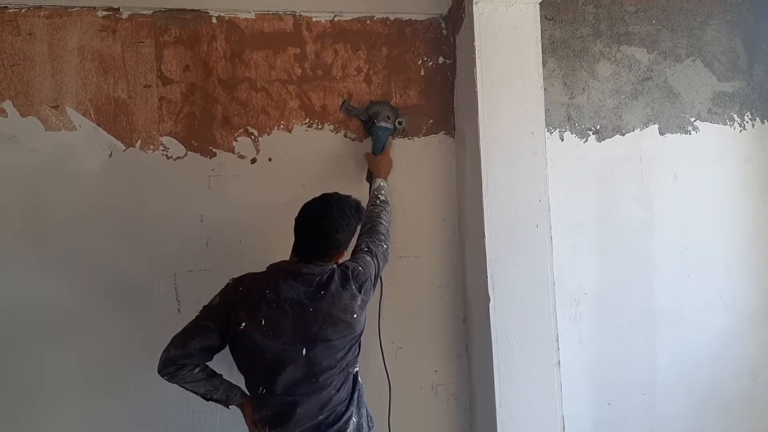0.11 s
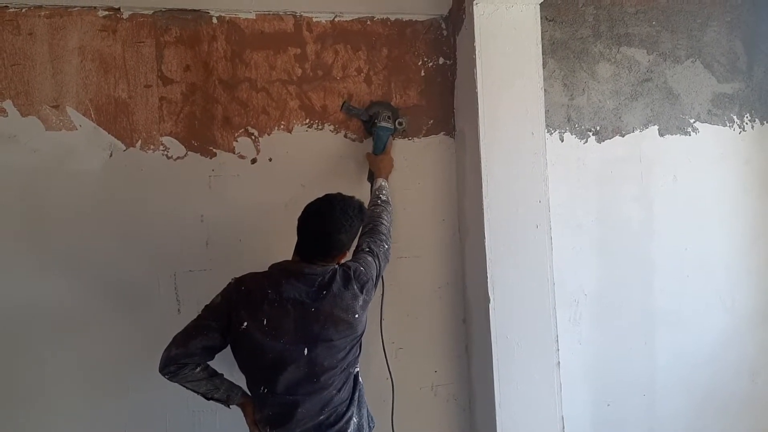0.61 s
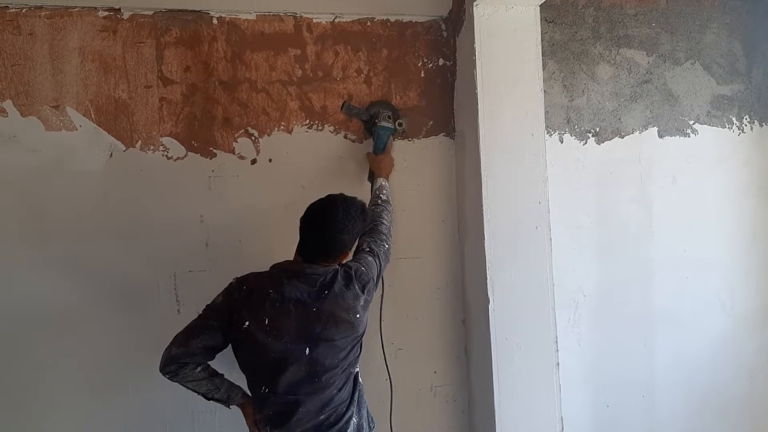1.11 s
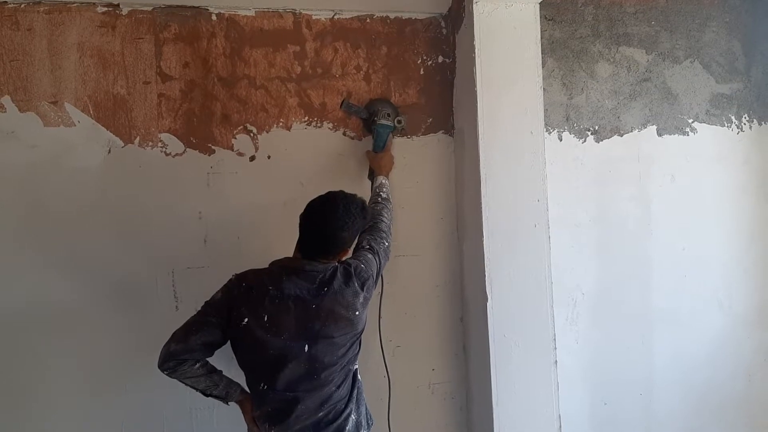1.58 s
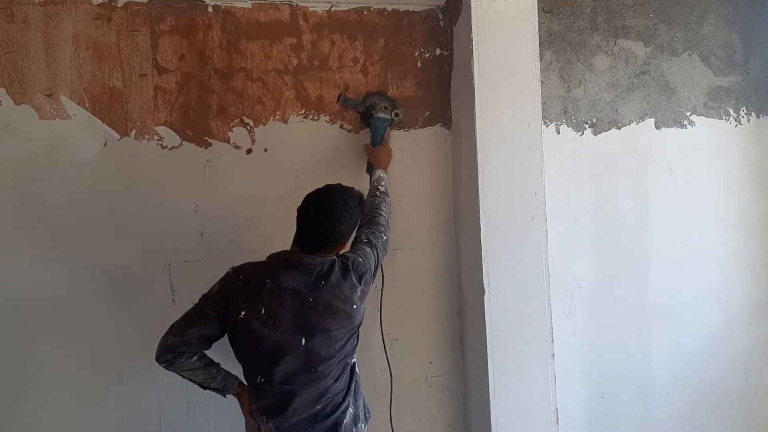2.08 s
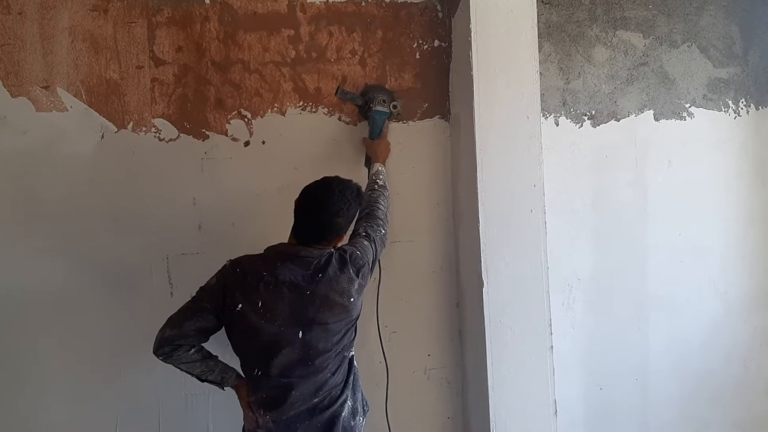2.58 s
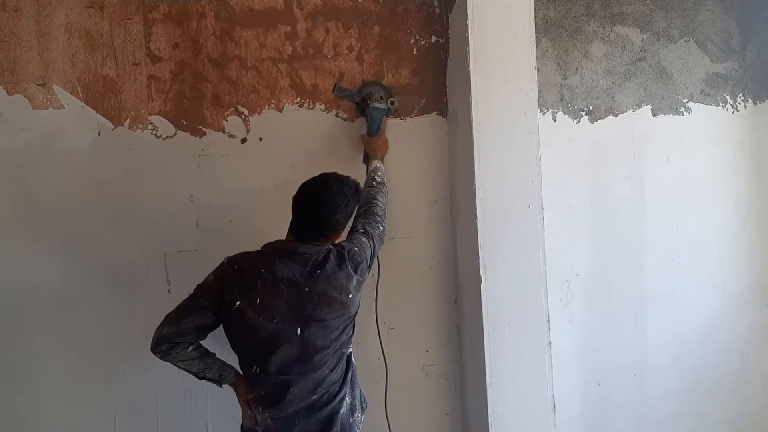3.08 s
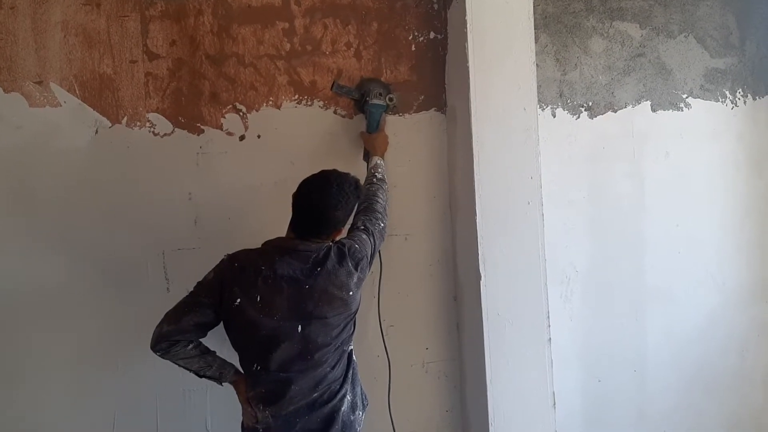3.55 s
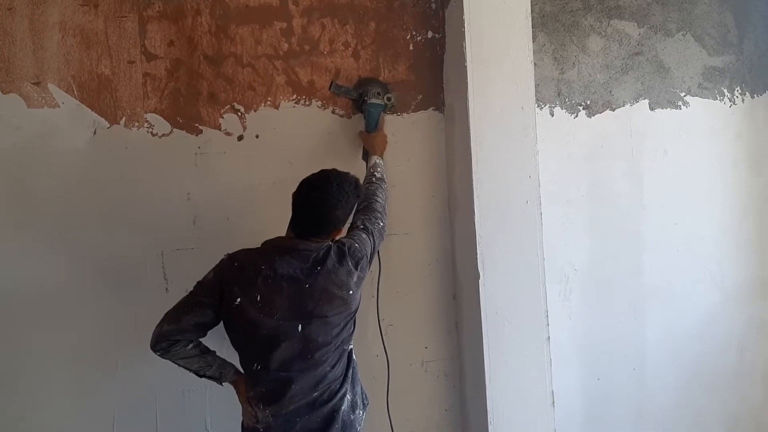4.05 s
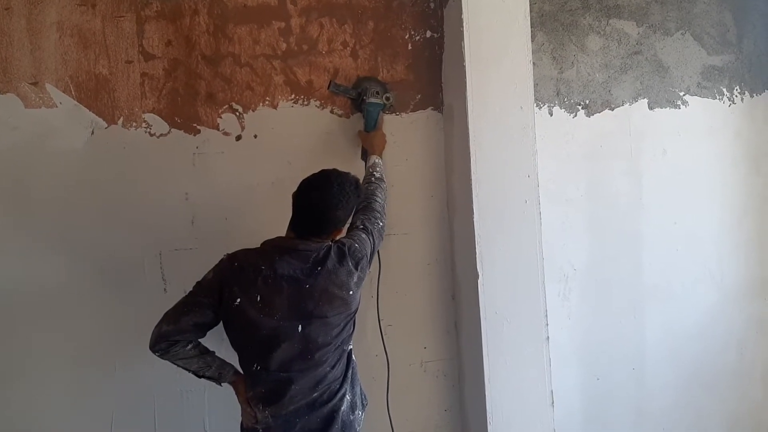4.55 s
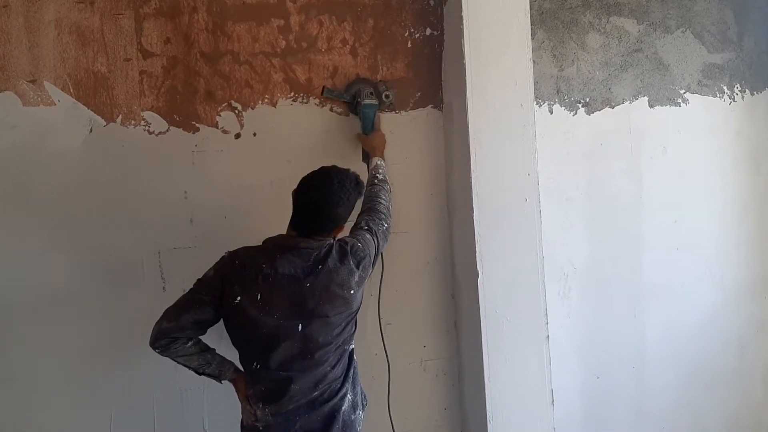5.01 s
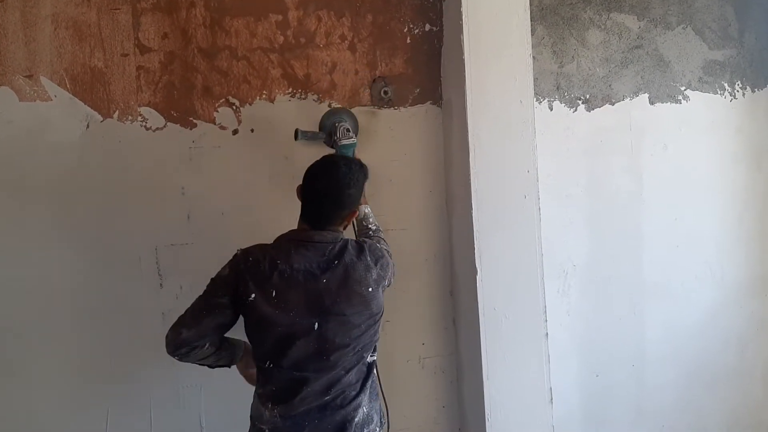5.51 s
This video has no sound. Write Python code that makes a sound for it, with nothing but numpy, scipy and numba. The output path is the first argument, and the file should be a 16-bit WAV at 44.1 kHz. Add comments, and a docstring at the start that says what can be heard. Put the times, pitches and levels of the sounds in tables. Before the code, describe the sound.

An electric angle grinder is already at full work, stripping coating from a wall in a bare, hard-surfaced room. From 0 to about 5 seconds there is a dense, continuous harsh noise: a metallic scraping ring in the middle range, bright sandy hiss on top, a high gear whine with rattling housing, and rushing fan air. A low lumpy rumble from the wall drops back around 1.6 seconds. The motor sags slightly in pitch near 1.7 to 2.3 seconds, then recovers; faint tones come and go, with a clearer ring around 3.4 to 4.4 seconds. At about 5 seconds the disc leaves the wall, the scrape cuts out, and the freed motor climbs in pitch, quieter and smoother. Near 5.3 seconds a small puff of hiss comes as the tool turns away, and it is still spinning at the end. Stereo pickup, short dense echo, slightly louder right.

```python
"""An angle grinder strips coating off a wall in a bare plastered room, heard by two microphones.
Grit scrapes and rings the disc and guard: noise grains with a faint repeat on every turn.
The bevel gear whines and the fan blows, as filtered noise; spindle tones come and go as sines.
At five seconds the disc leaves the wall: the scraping stops and the unloaded motor runs up."""
import sys
import numpy as np
from scipy import signal
from scipy.fft import rfft, irfft, next_fast_len
from scipy.io import wavfile
from scipy.ndimage import uniform_filter1d
from numba import njit

SR = 44100
rng = np.random.default_rng(int(sys.argv[2]) if len(sys.argv) > 2 else 0)


def transcribe(u):
    """Save the signal u as a 16-bit wav file named by the first command-line argument.

    u: samples, shape (n,) or (channels, n), limited to [-1, 1]; the rate is SR.
    q: integer samples, one column per channel.
    """
    v = np.clip(np.atleast_2d(u).T, -1, 1)
    q = np.round(v * 32767).astype(np.int16)
    wavfile.write(sys.argv[1], SR, q)


def gain_from_db(level_db):
    """Convert decibel levels to linear amplitude factors (20 dB per decade)."""
    decades = np.asarray(level_db, float) / 20
    return 10 ** decades


N = 248710
T = np.arange(N) / SR  # seconds

# Disc and guard resonances. Each row: centre in Hz, width in Hz, relative level in dB.
DISC_MODES = [(1190, 24, -18.5), (1592, 59, -14), (1550, 51, -10.5), (1662.6, 48, -2.5), (1744, 65, -2),
              (1821, 27, -4), (1870, 60, -13), (1932, 44, -9), (2077, 27, -24.5), (2183, 200, -11),
              (2595, 130, -15)]
# Treble rings of the disc rim. Each row: centre in Hz, width in Hz, relative level in dB.
RIM_MODES = [(8240, 30, 2.5), (14600, 450, 1)]
# Tone colour of the bare scrape. Each row: frequency in Hz, relative level in dB.
SCRAPE_COLOUR = [(40, -70), (80, -80), (600, -38), (1000, -32), (1400, -18.5), (1750, -16.5), (2500, -27),
                 (3500, -28), (7000, -27)]
# Tone colour of the grit hiss. Each row: frequency in Hz, relative level in dB.
GRIT_COLOUR = [(5000, -20), (7000, -2), (8800, -9), (10000, -5), (11000, -1), (12400, 0), (13500, -2.5),
               (14500, -1), (15000, 0), (16000, -1.5)]
# Disc ring while it cuts. Each row: time in seconds, relative level in dB.
CUTTING_RING = [(0, -22), (.4, -22), (.55, -20), (1.45, -19), (1.6, -20.5), (3.35, -22), (3.55, -18.5),
                (3.9, -19.5), (4.3, -21.5), (4.7, -19), (4.97, -19)]
# Gear housing resonances. Each row: centre in Hz, width in Hz, relative level in dB.
HOUSING_MODES = [(3230, 400, -31), (3900, 420, 8), (3950, 35, 0), (4210, 42, 15.5), (4775, 50, 11),
                 (4846, 140, 12), (5180, 190, 9.5), (5920, 950, 6), (6830, 830, -2.5)]
# Tone colour of the fan air. Each row: frequency in Hz, relative level in dB.
FAN_COLOUR = [(80, -60), (700, -55.5), (1200, -17.5), (2000, -16), (3000, -13), (4500, -7), (6000, -16),
              (7500, -36), (9000, -35), (16000, -23)]
# Motor and gearbox under load. Each row: time in seconds, relative level in dB.
MOTOR_LOADED = [(0, -18), (.1, -17.5), (3.1, -17), (3.5, -18.5), (4.97, -18)]
# Swells and dips of the free motor. Each row: centre in seconds, width in seconds, change in dB.
MOTOR_SWELLS = [(5.265, 0.019, -5), (5.36, 0.096, 3), (5.62, 0.07, 2.5)]
# Spindle speed under load. Each row: time in seconds, speed in turns a second.
LOADED_SPEED = [(0, 131.6), (.9, 132.1), (1.5, 130.6), (1.67, 128.6), (1.86, 126.8), (2.25, 127.4),
                (3.36, 130.9), (3.62, 132.6), (4.2, 132.3), (4.5, 130.9), (4.85, 130.6), (5.02, 132)]
# Spindle tones that come and go. Each row: multiple of the turn rate, start in seconds,
# end in seconds, level in dB.
SPINDLE_TONES = [(1, 0, 5.02, -60.5), (3, 1.4, 3.1, -56), (7, 1.7, 2.8, -54), (6, 2, 2.3, -58),
                 (4, 0, 1.5, -59), (7, .5, .53, -43), (7, .62, .69, -41), (7, .84, .89, -41),
                 (7, 1, 1.04, -41), (7, 1.15, 1.2, -43), (8, 2.8, 5, -51), (9, 2.8, 5, -44),
                 (10, 3.36, 4.42, -37), (13, 3.4, 4.4, -32), (13, 3.52, 3.61, -23), (13, 3.84, 3.97, -25),
                 (13, 4.04, 4.11, -23), (13, 4.2, 4.3, -26), (13, 4.5, 4.8, -31), (11, 3.5, 4.45, -41),
                 (4, 4.4, 5, -59), (32, .5, 1.1, -31), (33, .8, .95, -30), (32, 1.3, 1.55, -28),
                 (31, 1.75, 1.95, -29), (33, 2.1, 2.5, -32), (31, 2.3, 2.55, -28), (32, 2.66, 2.95, -24),
                 (32, 3, 3.4, -31), (32, 3.5, 3.92, -29), (32, 4.15, 4.4, -27), (32, 4.45, 4.8, -31),
                 (36, .1, .7, -30), (36, 2.7, 3.2, -32), (36, 4.25, 4.95, -31), (40, 1.3, 3.2, -35),
                 (45, 2.75, 3.15, -35), (16, 2.65, 2.9, -34), (1, 5.4, 5.7, -68), (3, 5.45, 5.7, -62),
                 (6, 5.46, 5.58, -44)]
# Hum at the fifth spindle multiple. Each row: time in seconds, level in dB.
SPINDLE_HUM = [(0, -55), (.4, -52), (1.2, -58), (1.28, -48), (1.52, -47), (1.6, -54.5), (2.65, -55),
               (2.8, -50.5), (3.1, -49), (4.4, -49.5), (4.5, -44.5), (4.7, -48), (4.82, -42.5), (4.92, -42),
               (5, -51), (5.07, -50), (5.1, -64)]
# Winding buzz at four times the mains. Each row: time in seconds, level in dB.
WINDING_BUZZ = [(0, -57), (.8, -65), (3, -70), (3.4, -75), (5.7, -81)]
# Tone colour of the wall rumble. Each row: frequency in Hz, relative level in dB.
WALL_COLOUR = [(30, -46), (110, -50), (200, -8), (400, -9.5), (700, -3.5), (950, 6), (1400, -7),
               (2000, -37)]
# Left-right difference of echo and rumble. Each row: frequency in Hz, level of the difference in dB.
SPREAD = [(60, -22), (200, -21), (400, -5), (700, -1), (1500, -3), (3000, -1.5), (6000, 4), (16000, -1.5)]

JUDDER, FLUTTER, WAVER, SWAY = 90, 60, 24, 7  # random level steps a second
MAINS_HZ, GEAR_TEETH, HUM_MULTIPLE = 50, 32, 5
LIFT_S, LIFT_TAKES_S = 4.98, 0.043  # the disc leaves the wall
RUN_UP_S, RUN_UP_TAU_S, FREE_TURNS = 5.07, 0.33, 178  # then climbs towards this many turns a second
GRIT_DB, RUMBLE_DB = -22, -38.5  # while cutting
RUMBLE_DROP_S, RUMBLE_DROP_TAKES_S, RUMBLE_DROP_DB = 1.545, 0.057, -13
SPINNING_RING_DB, SPINNING_GRIT_DB, SPINNING_RUMBLE_DB = -34.5, -39, -49  # off the wall
FADE_DB, FADE_TAU_S = 3, 0.13  # hiss and rumble die away for a moment after the lift
# as the free disc is turned away its hiss steps up, with a short puff
PUFF_S, PUFF_RISE_S, PUFF_DECAY_S, PUFF_DB, PUFF_STAYS_DB = 5.305, 0.02, 0.04, 2, 4
MOTOR_FREE_DB, MOTOR_EASES_S = -21, 0.13
WHINE_WIDTH_HZ, VENT_WIDTH_HZ, VENT_DB = 680.0, 520.0, -9.5  # widths for each filter pass
ROOM_T60_S, ROOM_DB = 0.42, -2.1
RIGHT_DB = 1.5  # right channel over left
LOW_HZ, TOP_HZ = 75, 15750  # range of the finished sound


def disc(speed, pressure, grip):
    """Scraping grains ring the metal disc, and grit hisses off it."""
    ring_db, grit_db, _ = contact()
    rub = every_turn(grains(5.2, 1.7, JUDDER), SR / speed, 0.2)
    ringing = gain_from_db(-0.5) * ring(rub, DISC_MODES, flicker_db=1.6, rate=FLUTTER, sway_db=0.91)
    scrape = gain_from_db(-9.0) * unit(colour(rub, SCRAPE_COLOUR))
    metal = gain_from_db(ring_db) * (ringing + scrape)
    hiss = unit(colour(grains(2.5, 1.64, JUDDER), GRIT_COLOUR, RIM_MODES))
    grit = gain_from_db(grit_db + 0.53 * walk(WAVER) + 0.71 * walk(FLUTTER)) * hiss
    return pressure * metal + grip * grit


def contact():
    """Levels in dB of ring, grit and rumble: cutting, then spinning in the air."""
    off = ramp(LIFT_S, LIFT_TAKES_S)
    since_puff = np.maximum(T - PUFF_S - PUFF_RISE_S, 0)
    puff_db = PUFF_STAYS_DB + PUFF_DB * np.exp(-since_puff / PUFF_DECAY_S)
    puff_db = ramp(PUFF_S, PUFF_RISE_S) * puff_db
    fade_db = FADE_DB * np.exp(-np.maximum(T - LIFT_S, 0) / FADE_TAU_S)
    rumble_db = RUMBLE_DB + RUMBLE_DROP_DB * ramp(RUMBLE_DROP_S, RUMBLE_DROP_TAKES_S)
    cutting = curve(CUTTING_RING), GRIT_DB, rumble_db
    spinning = SPINNING_RING_DB, SPINNING_GRIT_DB + fade_db + puff_db, SPINNING_RUMBLE_DB + fade_db
    return [(1 - off) * a + off * b for a, b in zip(cutting, spinning)]


def motor(speed, grip):
    """Fan air, gear rattle and mesh whine, pulsing at twice the mains; the whine follows the speed."""
    mains = 1 + 0.16 * np.cos(2 * np.pi * 2 * MAINS_HZ * T)
    # under load the housing rings; running free, the mesh whine and the air vents take over
    free = np.interp(T, [5, 5.32], [0, 1])

    rattle = every_turn(grains(2.6, 2.2, JUDDER), SR / speed, 0.2)
    housing = ring(rattle, HOUSING_MODES, flicker_db=1.8, rate=FLUTTER, sway_db=1.3)
    housing = gain_from_db(-3.0 - 16 * free) * housing

    # the whine's band sits slightly above the tooth rate when running free
    whine_hz = (GEAR_TEETH + 0.3 * free) * speed
    knock_db = 4 * free * np.cos(2 * np.pi * np.cumsum(speed) / SR)  # free gears knock once a turn
    mesh_db = -11.5 + 7 * free + knock_db + 0.8 * walk(FLUTTER)
    mesh = gain_from_db(mesh_db) * moving_note(grains(2, 1, JUDDER), whine_hz, WHINE_WIDTH_HZ)

    air = gain_from_db(1.0 - 3 * free) * unit(colour(grains(2.56, 0.69, JUDDER), FAN_COLOUR))
    # the vent note sinks as the tool turns away
    vent_hz = np.interp(T, [5.18, 5.3, 5.4, 5.5], [3550.0, 3250.0, 2850.0, 2950.0])
    vents = moving_note(rng.standard_normal(N), vent_hz, VENT_WIDTH_HZ)
    vents = free * gain_from_db(VENT_DB + 0.8 * walk(WAVER)) * vents
    return gain_from_db(motor_db()) * mains * (grip * (housing + mesh) + air + vents)


def motor_db():
    """Level of motor and gearbox: eases off with the load, then swells and dips as the tool is moved."""
    eased = ramp(LIFT_S, MOTOR_EASES_S)
    swell_db = sum(db * np.exp(-((T - s) / width) ** 2) for s, width, db in MOTOR_SWELLS)
    return (1 - eased) * curve(MOTOR_LOADED) + eased * MOTOR_FREE_DB + swell_db


def spindle():
    """Turns a second: the load sets them, then they climb towards the free speed."""
    loaded = curve(LOADED_SPEED)
    run_up = 1 - np.exp(-np.maximum(T - RUN_UP_S, 0) / RUN_UP_TAU_S)
    return loaded + (FREE_TURNS - loaded) * run_up


def tones(speed):
    """Sines at multiples of the spindle turn, wavering in strength and phase, over a winding buzz."""
    turn = 2 * np.pi * np.cumsum(speed) / SR

    def tone(multiple, db):
        """One spindle multiple; its phase wanders more the higher it is."""
        phase = multiple * turn + 0.05 * multiple * walk(WAVER)
        return gain_from_db(db + 1.7 * walk(WAVER)) * np.sqrt(2) * np.sin(phase)

    buzz = np.sqrt(2) * np.sin(2 * np.pi * 4 * MAINS_HZ * T)
    buzz = gain_from_db(curve(WINDING_BUZZ) + 2.5 * walk(SWAY)) * buzz
    out = tone(HUM_MULTIPLE, curve(SPINDLE_HUM)) + buzz
    for multiple, start, end, db in SPINDLE_TONES:
        # 55 ms fades reach a little outside the given times
        fade = np.clip(np.minimum(T - start + 0.041, end - T + 0.051) / 0.055, 0, 1)
        out = out + fade * tone(multiple, db)
    return out


def wall():
    """The wall rumbles in lumps of filtered grains; its bass is alike left and right."""
    mid, side = (unit(colour(grains(2.0, 0.43, FLUTTER), WALL_COLOUR)) for _ in range(2))
    side = gain_from_db(-2.5) * colour(side, SPREAD)
    rumble_db = contact()[2] - 1.0 + 0.67 * walk(WAVER) + 1.6 * walk(SWAY)
    return gain_from_db(rumble_db) * np.array([mid + side, mid - side])


def room(x):
    """Direct sound, a shade earlier on the left, and a dense echo that changes as the tool moves."""
    hop = int(SR * 0.2)  # a new noise tail every 0.2 s, cross-faded
    t = T[:3 * hop]
    lead = np.concatenate([x[3 * hop:0:-1], x, np.zeros(2 * hop)])  # the tool was already running
    wet = np.zeros((2, len(lead) + 5 * hop))
    fade = np.sin(np.pi * np.arange(2 * hop) / (2 * hop))
    decay = gain_from_db(-60 * t / ROOM_T60_S) * np.clip((t - 0.002) / 0.0024, 0, 1)
    for i in range(0, len(lead) - 2 * hop, hop):
        tail = rng.standard_normal((2, len(t))) * decay
        mid, side = tail[0], colour(tail[1], SPREAD)  # same bass, different treble at each microphone
        pair = np.array([mid + side, mid - side]) / np.sqrt(np.sum(mid ** 2))
        piece = lead[i:i + 2 * hop] * fade
        wet[:, i:i + 5 * hop - 1] += signal.fftconvolve(piece[None], pair, axes=1)
    direct = np.array([x, np.roll(x, 1)])
    echo = gain_from_db(ROOM_DB) * wet[:, 3 * hop:3 * hop + N]
    return (direct + echo) * gain_from_db(-3.5)


def grains(scatter_db, flicker_db, rate):
    """Dense clicks of uneven but bounded size under a flickering pressure."""
    size = np.minimum(rng.exponential(size=N), 5)
    return rng.standard_normal(N) * gain_from_db(scatter_db * size + flicker_db * walk(rate))


@njit
def every_turn(x, lag, keep):
    """Feed the sound back one spindle turn later: a faint repeat of the same grains each turn."""
    y = x.copy()
    for i in range(500, len(x)):
        k = int(lag[i])
        part = lag[i] - k
        y[i] += keep * ((1 - part) * y[i - k] + part * y[i - k - 1])
    return y


def ring(x, modes, flicker_db, rate, sway_db):
    """Resonances that each flutter and trade strength as the grip and contact shift."""
    total = 0
    for mode in modes:
        strength = gain_from_db(flicker_db * walk(rate) + sway_db * walk(SWAY))
        total = total + strength * colour(x, [(100, -89), (16000, -91)], [mode])
    return unit(total)


def moving_note(x, hz, width):
    """Noise narrowed twice round a moving centre, at rms 1."""
    return unit(band(band(x, hz, width), hz, width))


@njit
def band(x, hz, width):
    """State-variable band-pass whose centre moves."""
    y, b, l = np.empty(len(x)), 0., 0.
    for i in range(len(x)):
        g, k = np.tan(np.pi * hz[i] / SR), width / hz[i]
        v = (b + g * (x[i] - l)) / (1 + g * (g + k))
        b, l, y[i] = 2 * v - b, l + 2 * g * v, k * v
    return y


def colour(x, points, modes=()):
    """Filter by a (Hz, dB) spectrum with resonance humps standing on it."""
    size = next_fast_len(x.shape[-1])
    hz = np.arange(size // 2 + 1) * SR / size + 1e-3
    f, db = np.transpose(points)
    power = gain_from_db(np.interp(np.log(hz), np.log(f), db)) ** 2
    for centre, width, level_db in modes:
        power = power + gain_from_db(level_db) ** 2 / (1 + (2 * (hz - centre) / width) ** 2) ** 2
    return irfft(rfft(x, size) * np.sqrt(power), size)[..., :x.shape[-1]]


def walk(rate):
    """Quick random flutter from rate random steps a second, no slow drift or wild peaks; spread 1."""
    k = int(SR / rate)
    steps = np.repeat(rng.standard_normal(N // k + 1), k)
    steps = uniform_filter1d(steps, k)[:N]
    quick = unit(steps - uniform_filter1d(steps, 2 * k))
    return unit(np.tanh(0.6 * quick))


def unit(x):
    """Scale to rms 1."""
    return x / np.sqrt(np.mean(x ** 2))


def curve(table):
    """A (seconds, value) table drawn out to one value a sample."""
    s, value = np.transpose(table)
    return np.interp(T, s, value)


def ramp(start, length):
    """0 before start, 1 after start + length."""
    return np.clip((T - start) / length, 0, 1)


def scene():
    """Disc and motor sound in the room; rumble and tones are added without echo."""
    speed = spindle()
    pressure = gain_from_db(2.03 * walk(JUDDER))  # the hand never presses evenly
    grip = gain_from_db(3.0 * walk(JUDDER))  # the tool shakes in the grip
    sound = room(disc(speed, pressure, grip) + motor(speed, grip)) + wall() + tones(speed)
    return sound * gain_from_db(np.array([[-RIGHT_DB], [RIGHT_DB]]) / 2)


def low_pass(x):
    """Removes everything above the highest recorded frequency."""
    return signal.sosfilt(signal.butter(12, 16580, fs=SR, output="sos"), x)


def record(dry):
    """Loud peaks are rounded, the deepest bass and everything above 15.75 kHz cut."""
    rounded = 1.3 * np.tanh(dry / 1.3)
    low_cut = signal.butter(4, LOW_HZ, "high", fs=SR, output="sos")
    mic = signal.sosfilt(low_cut, rounded)
    mic = colour(mic, [(TOP_HZ, 0), (TOP_HZ + 60, -70)])
    return low_pass(mic)


dry = scene()
out = record(dry)
transcribe(out)
```